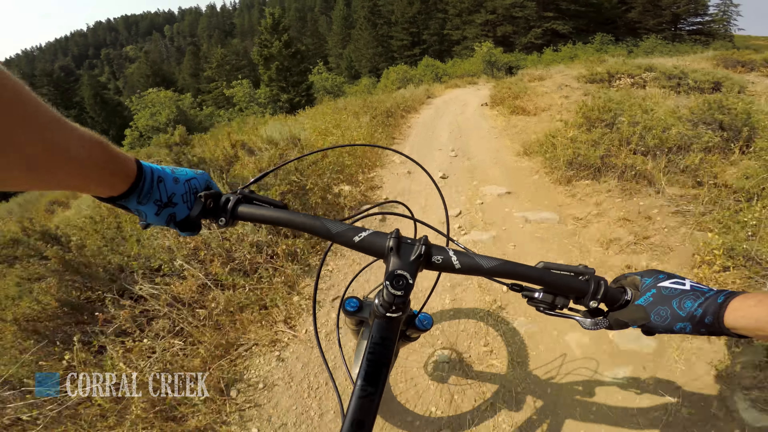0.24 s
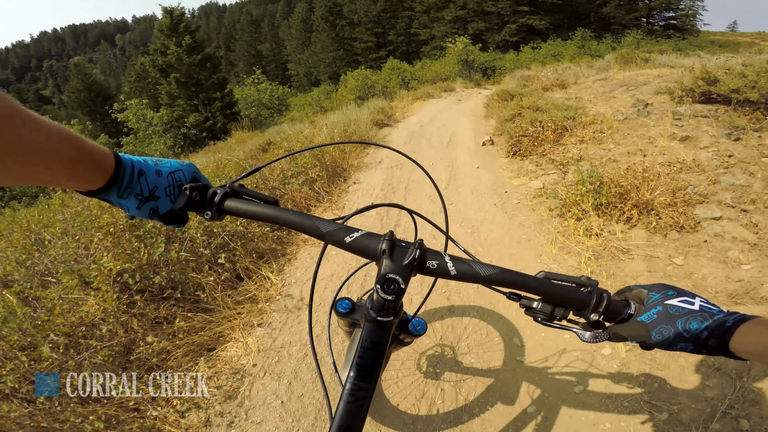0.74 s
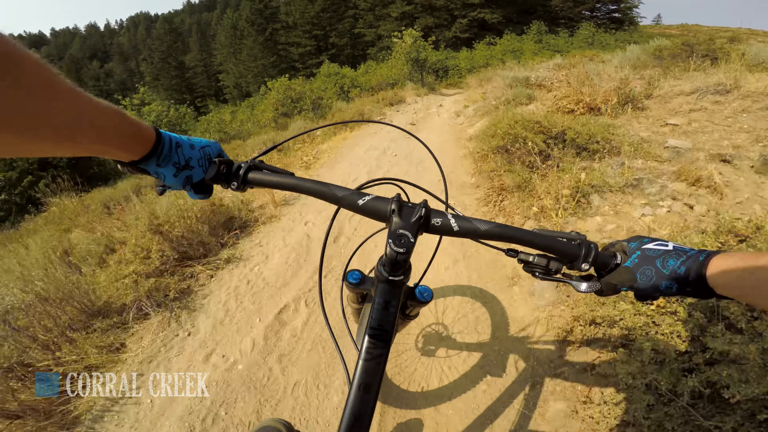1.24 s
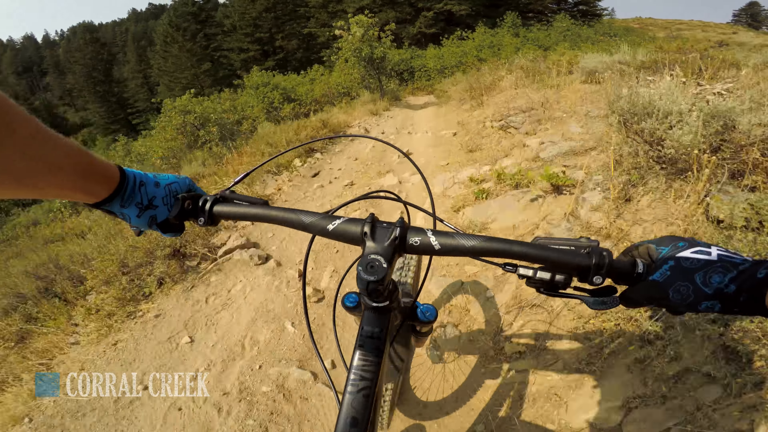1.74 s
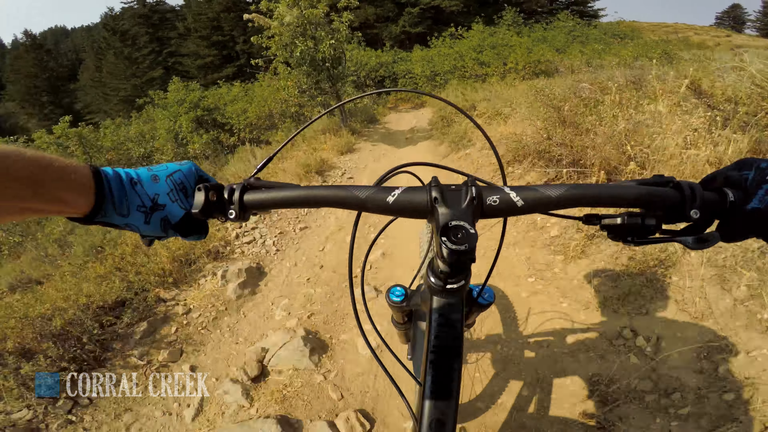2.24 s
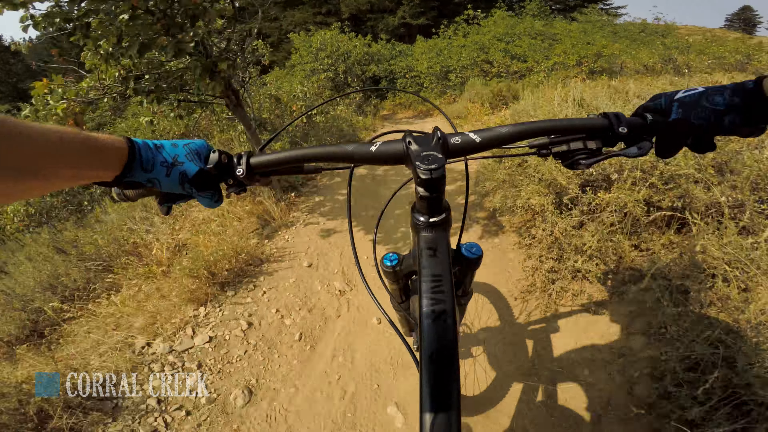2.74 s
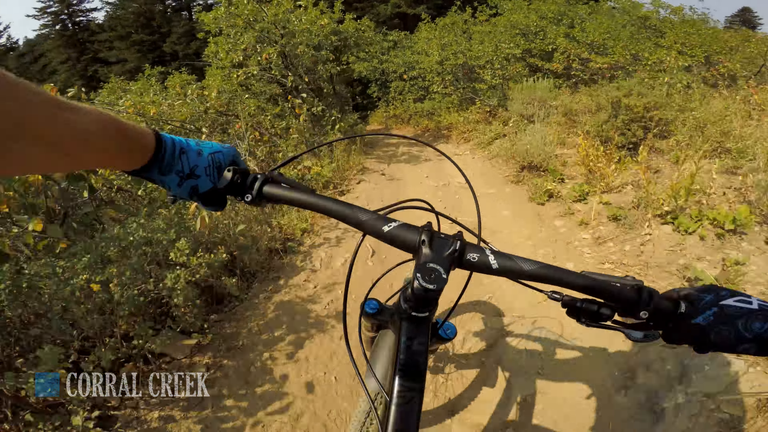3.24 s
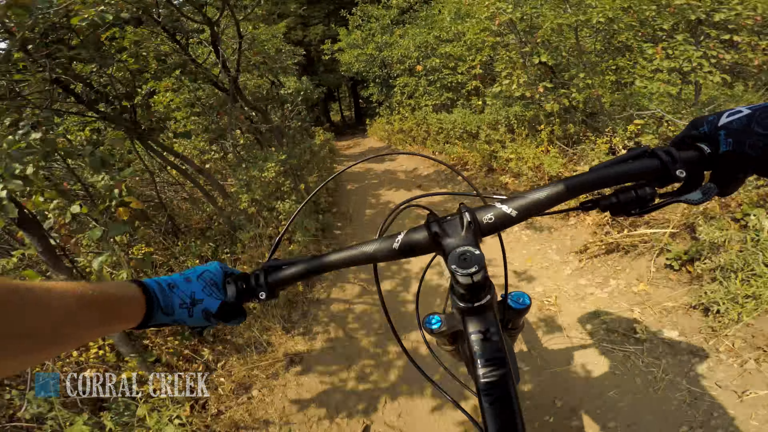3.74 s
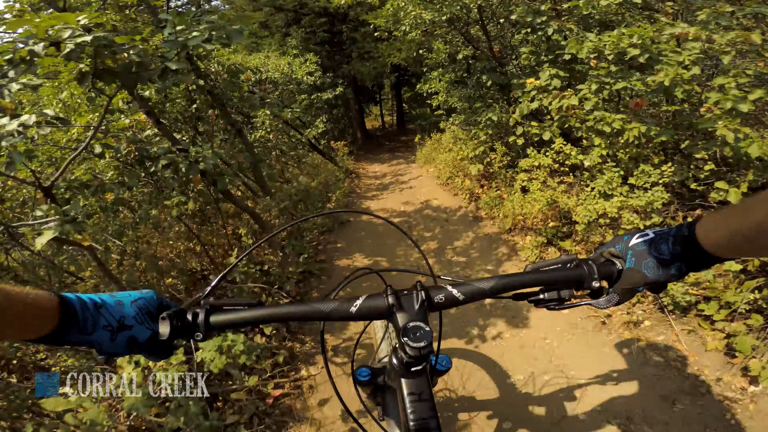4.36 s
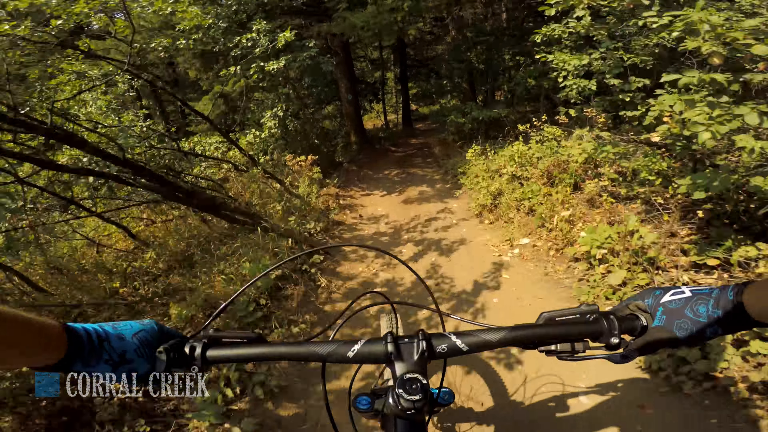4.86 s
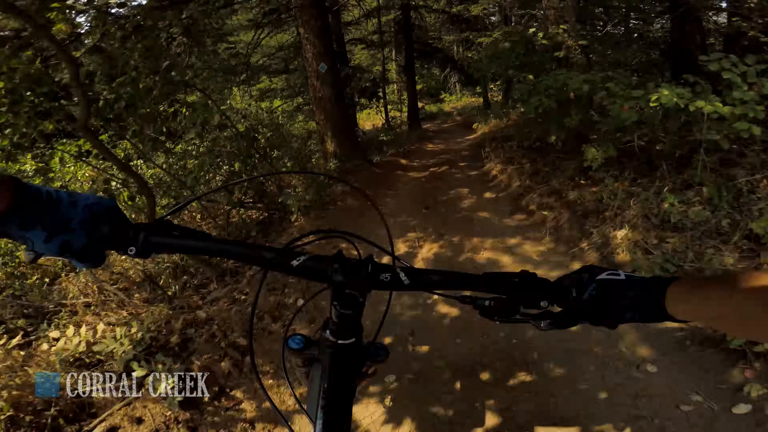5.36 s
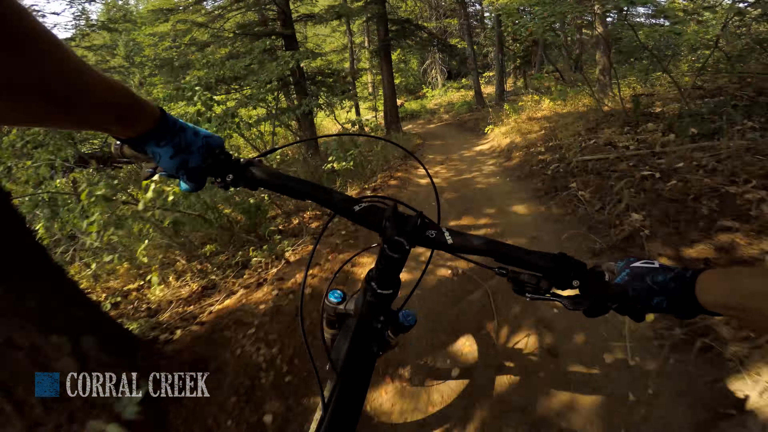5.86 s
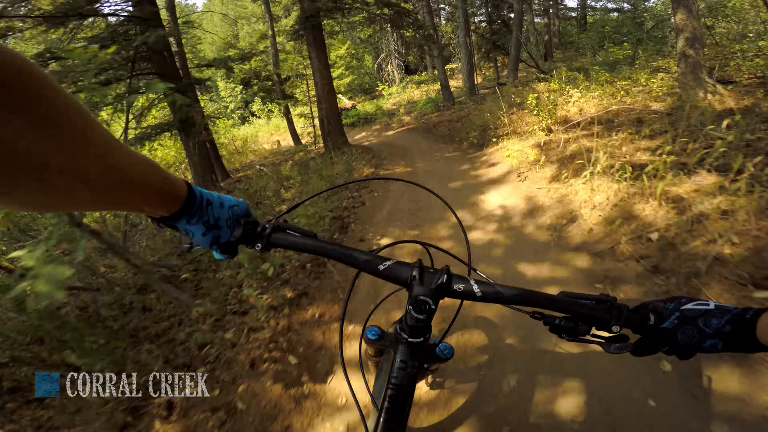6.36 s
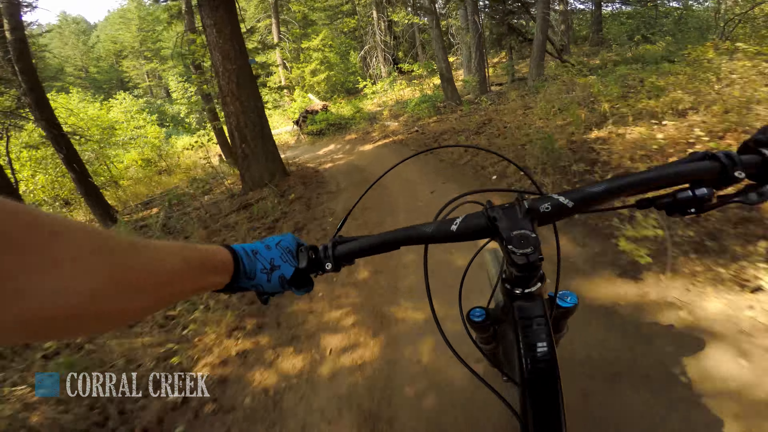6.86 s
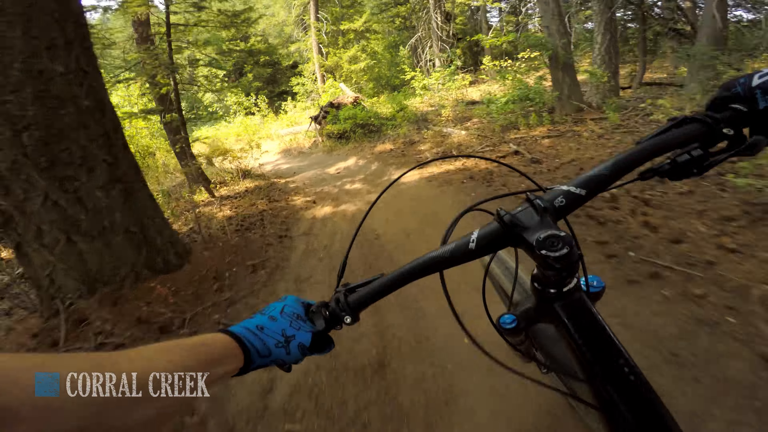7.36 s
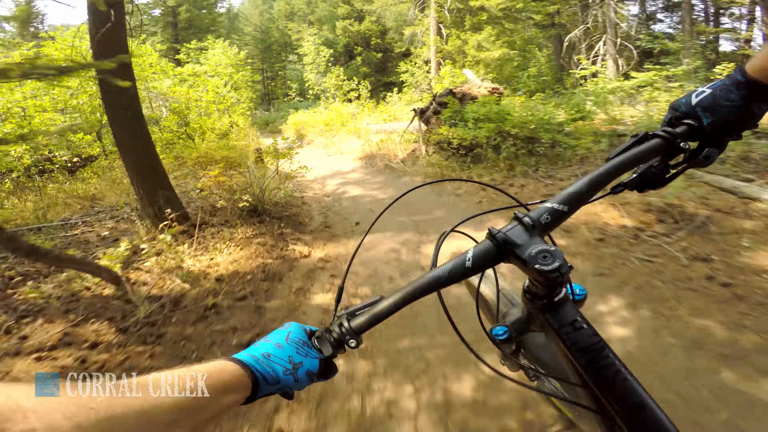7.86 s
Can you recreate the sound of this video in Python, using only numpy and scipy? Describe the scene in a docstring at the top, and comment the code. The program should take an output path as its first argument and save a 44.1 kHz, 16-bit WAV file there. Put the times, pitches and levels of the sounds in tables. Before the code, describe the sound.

Close to a chest-worn microphone, a mountain bike coasts down a dry trail. Tyres crunch, hiss and drone over a buzzing metallic freewheel while low wind gusts buffet. Around two seconds it slams over rocks with a brief lift, loud clonks, brake chirps, pinging stones and spraying gravel. Afterwards come scattered thumps and chain slaps, wind easing among trees, then a cluster of slaps and a growling bend.

```python
"""Tyres crunch, hiss and drone down a dry, rocky trail as a mountain bike coasts, heard from a chest-worn camera.
Shaped noise and random impacts make the rolling sound, louder where the ground is rough; timed clicks ring the
freewheel's hub; low noise makes the gusts, weaker among the trees. Decaying bursts through resonances make the
thumps, knocks and chain slaps; the chain rattles on, brakes chirp and flung stones ping on metal. The wheels
leave the ground just before the hardest landing, which throws up a shower of gravel."""
import sys
import numpy as np
from scipy import signal
from scipy.fft import rfft, irfft, next_fast_len
from scipy.io import wavfile
from scipy.ndimage import uniform_filter1d, map_coordinates

SR = 44100
rng = np.random.default_rng(int(sys.argv[2]) if len(sys.argv) > 2 else 0)


def dump_mix(stems):
    """Bounce the given channels to the path in sys.argv[1] as a 16-bit WAV at rate SR."""
    frames = np.atleast_2d(stems).T  # one column per channel
    limited = np.clip(frames, -1, 1)  # hard clip at full scale
    pcm = np.round(limited * 32767).astype(np.int16)
    wavfile.write(sys.argv[1], SR, pcm)


N = 357651
TIME = np.arange(N) / SR  # s
HIT = TIME[:SR // 4]  # time axis of one hit, s

# Steady wind on the open hillside and among the trees [dB]; when the trees close in, and how gradually [s]
OPEN_WIND_DB, SHELTERED_WIND_DB, TREES_S, TREES_FADE_S = -15.5, -19, 3.8, 0.69
# Gusts (+) and lulls (-): (middle [s], half length [s], change of wind [dB])
GUSTS = [(0.407, 0.23, 1.5), (1.794, 0.078, -6), (2.134, 0.035, 5), (2.547, 0.091, 7.5),
         (2.803, 0.18, -5.5), (3.473, 0.15, 3.5), (4.3, .15, -3), (4.656, 0.051, 4), (4.877, 0.089, -6),
         (5.43, 0.033, 6), (7.45, 0.12, 2.5), (7.8, 0.18, -4)]
# Spectrum of wind pressure on the microphone: (frequency [Hz], density [dB per Hz])
BUFFET_SPECTRUM = [(10, -33), (18, -1), (30, 2.5), (45, -1.5), (67, -6.5), (100, -19.5), (156, -30.5),
                   (260, -45), (500, -70)]
# Spectrum of the higher wind flutter: (frequency [Hz], density [dB per Hz])
FLUTTER_SPECTRUM = [(40, -14), (92, 6.0), (160, -5.0), (240, -17.5), (600, -57.0)]

# How hard the ground works the tyres, used relative to its mean: (time [s], level [dB])
GROUND = [(0.0, -29.5), (0.29, -31.5), (0.59, -31), (1.53, -33.5), (2.21, -29), (2.5, -32), (2.64, -35.5),
          (2.8, -34.5), (3.52, -31), (4.13, -34.5), (4.79, -34.5), (5.0, -34), (5.49, -31.5), (6.08, -34),
          (6.66, -32), (7.88, -34.5), (8.11, -31)]
# Wheels off the ground: (middle [s], half length [s], drop of the contact noise [dB])
HOPS = [(0.625, 0.015, 3), (2.174, 0.013, 8), (2.74, 0.018, 3)]
# Each rolling layer: rms level on average ground [dB], growth [dB per dB of ground]
DRONE_DB, DRONE_GROWS = -32, 0.98
CRUNCH_DB, CRUNCH_GROWS = -35.5, 1.35
DUST_DB, DUST_GROWS = -42.5, 0.54
FREEWHEEL_DB, FREEWHEEL_GROWS = -39, 0.11

# Resonances of the hollow camera housing: (frequency [Hz], width [Hz], level [dB])
HOUSING_MODES = [(313, 22.3, -3.5), (364, 200, -12.5), (469, 39, -19.5), (643, 31, -21.5)]
# Tonal balance of the housing's drone: (frequency [Hz], gain [dB])
DRONE_COLOUR = [(100, 4.0), (280, 2.5), (650, 0.0), (1200, -10.0), (4000, -28)]
# The housing's hum: pitch [Hz], scale of its wander [Hz], rms level on average ground [dB]
HUM_HZ, HUM_WANDER_HZ, HUM_DB = 308.7, 7.47, -36.5

# Mean click rate of the freewheel: (time [s], clicks per second [1/s])
CLICK_RATE = [(0, 98), (1.5, 163), (2.9, 102), (4.2, 99), (5.3, 116), (6.9, 107), (8.1, 143)]
# Resonances of the hub: (frequency [Hz], width [Hz], level [dB])
HUB_MODES = [(2543, 104, 6), (2920, 124, 3), (3252, 40, 2), (3770, 150, 1), (4983, 82, 5),
             (5310, 190, -0.5), (6300, 150, -3.5), (6790, 160, -2), (7260, 220, -3.5), (7840, 114, -2),
             (8450, 100, -8), (10065, 50, -11)]
# Tonal balance of the freewheel: (frequency [Hz], gain [dB])
FREEWHEEL_COLOUR = [(800, -26), (2200, 4), (15000, -1.5)]
# The hub rings out briefly on one resonance: (time [s], rms level at the top [dB], frequency [Hz])
SWELLS = [(1.27, -40, 5130), (1.39, -40, 5050), (2.82, -39, 5110), (3.09, -43, 5060), (3.55, -40, 5000),
          (4.98, -36.5, 2500), (7.27, -44, 5000)]
SWELL_HALF_S, SWELL_WIDTH_HZ = 0.05, 280

# Pebbles that tap the rim: taps [1/s], rms level on average ground [dB]
PEBBLE_RATE, PEBBLE_DB = 13, -47.5
# Resonances of the tapped rim: (frequency [Hz], width [Hz], level [dB])
RIM_MODES = [(1210, 310, 2.2), (1710, 2500, 1.1), (2600, 500, 5)]
# Grit that cracks under the knobs: cracks [1/s], rms level on average ground [dB]
CRACKLE_RATE, CRACKLE_DB = 110, -47
# Tonal balance of the cracks: (frequency [Hz], gain [dB])
CRACKLE_COLOUR = [(400, -2), (1300, -8.5), (3000, -1.0), (6000, -12.5), (14000, -19), (17000, -46)]

# The last bend: middle [s], half length [s], rms level of the tyres' growl at the middle [dB]
BEND_S, BEND_HALF_S, BEND_DB = 7.8, 0.81, -35.5
# Resonances of the loaded tyre casing: (frequency [Hz], width [Hz], level [dB])
CASING_MODES = [(181, 52, -8), (337, 52, 1), (930, 51, -4)]
# Tonal balance of the growl: (frequency [Hz], gain [dB])
GROWL_COLOUR = [(80, -11), (170, 5.0), (950, -12.5), (2000, -22)]
# Tyres slide sideways over hard dirt: (middle [s], half length [s], rms level at the middle [dB])
SKIDS = [(2.24, 0.096, -31), (5.617, 0.11, -35.5)]
# Resonances of the sliding tread: (frequency [Hz], width [Hz], level [dB])
TREAD_MODES = [(630, 61, 2), (1240, 120, -6)]
# Gravel thrown up by the tyres: (time [s], rms level at the start [dB], t60 [s])
SPRAYS = [(1.974, -29, 0.45), (2.203, -26, 0.5)]
# Tonal balance of flying gravel: (frequency [Hz], gain [dB])
GRAVEL_COLOUR = [(420, 11), (800, -9), (1600, 0), (4000, -2), (6000, -1), (11000, -12), (15000, -18),
                 (17000, -40)]

# Brake pads brush the rotor: (time [s], rms level at the top [dB], half length [s], pitch [Hz])
CHIRPS = [(0.495, -22, 0.0024, 6900), (2.014, -26, 0.0087, 7200), (2.034, -26.5, 0.011, 7260),
          (2.087, -26, 0.0031, 6900), (2.204, -26.5, 0.0092, 7100), (2.617, -25.5, 0.0037, 6400),
          (3.698, -32, 0.0071, 6800), (5.109, -31, 0.014, 6850), (7.486, -30, 0.0038, 7005)]
# Small stones on metal: (time [s], peak level [dB])
PINGS = [(.483, -21), (0.863, -19), (1.938, -22), (1.986, -15), (2.037, -15.5), (2.148, -15.5),
         (2.236, -4.5), (2.369, -15), (2.405, -19), (2.501, -5), (2.644, -21.5), (3.325, -14.5),
         (4.696, -13.5), (5.936, -20.5)]
# Tonal balance of a stone's crack: (frequency [Hz], gain [dB])
PING_COLOUR = [(2000, -4.5), (5000, -6), (8000, -5.5), (10200, 1.5), (12500, -11.5), (14700, -10),
               (15400, -12), (16500, -38)]
# Ringing modes of rotor, spokes and chain: (frequency [Hz], level [dB], t60 [s])
METAL_MODES = [(3265, -10, .16), (3760, -9, .1), (7228, -12, .1), (10065, -4, .055), (14170, -15, .08),
               (14585, -8, .04)]

# Chain and cable slaps: (time [s], peak level [dB], centre frequency [Hz])
SLAPS = [(0.632, -18, 2700), (2.101, -13, 3100), (2.277, -10.5, 3660), (2.317, -16, 4080),
         (2.398, -16.5, 3800), (2.486, -16, 3500), (2.565, -15, 2630), (2.614, -18.5, 2460),
         (2.641, -15.5, 3920), (3.669, -20, 3400), (4.346, -18.5, 2580), (4.448, -18.5, 2300),
         (4.497, -21, 2400), (4.585, -18, 2560), (4.719, -19.5, 2570), (4.935, -16, 2400),
         (5.252, -20, 2550), (7.406, -16.5, 2460), (7.451, -16, 2900), (7.464, -17, 3800),
         (7.484, -21, 3750), (7.501, -15, 2700), (7.535, -15, 2700), (7.575, -13.5, 2860),
         (7.628, -16, 2950), (7.641, -18, 3740), (7.698, -21, 3680)]
# Resonances shared by all slaps: (frequency [Hz], width [Hz], level [dB])
SLAP_MODES = [(4400, 900, -10), (1300, 900, -9)]
# Tonal balance of slaps and rattle: (frequency [Hz], gain [dB])
SLAP_COLOUR = [(400, 12), (1200, -3.5), (4600, -5.5), (6000, -11), (14000, -11)]
# The chain rattles on: starting rms level against the slap's peak [dB], t60 [s]
RATTLE_DB, RATTLE_T60_S = -23, 0.24
# Resonances of the rattling chain: (frequency [Hz], width [Hz], level [dB])
CHAIN_MODES = [(1600, 810, 4), (2730, 600, 5), (3810, 180, 13), (4420, 1300, -28)]

# Rocks against rim and frame: (time [s], peak level [dB], centre frequency [Hz])
KNOCKS = [(0.038, -14.5, 1410), (0.159, -17, 1326), (1.963, -22, 1040), (1.988, -21, 1500),
          (2.038, -10.5, 2050), (2.059, -18, 1640), (2.1, -14, 1110), (2.192, -13, 2170), (2.195, -8, 910),
          (2.198, -5, 1560), (2.202, -10, 560), (2.345, -23, 1600), (2.485, -23, 900), (2.584, -16, 1100),
          (3.404, -15, 1910), (3.645, -19, 800), (3.716, -21, 700), (4.295, -19, 1600), (4.447, -26, 900),
          (4.797, -16, 1615), (4.871, -20, 1900), (5.494, -19, 650), (5.514, -23, 493), (5.562, -23, 570),
          (5.611, -25, 1200), (5.635, -21, 1210), (5.662, -17, 1240), (6.239, -19, 1870),
          (6.763, -10.5, 1200), (7.445, -19, 1316)]
# Resonances shared by all knocks: (frequency [Hz], width [Hz], level [dB])
KNOCK_MODES = [(515, 70, -4), (900, 160, -9), (1240, 90, -2), (2450, 700, -8)]
# Tonal balance of knocks, pebble taps and skids: (frequency [Hz], gain [dB])
KNOCK_COLOUR = [(150, -20), (330, 10.5), (2200, 5.5), (3300, -4), (6000, -14), (14000, -40)]
# Bumps through the tyres: (time [s], peak level [dB], pitch of the tyre's bounce [Hz])
THUMPS = [(1.083, -19, 288), (2.01, -14.5, 312), (2.089, -17.5, 313), (2.193, -9.5, 400), (2.236, -18, 372),
          (2.588, -17.5, 313), (2.95, -18, 295), (3.414, -16, 400), (3.641, -13, 246), (3.67, -28, 310),
          (3.8, -15, 296), (4.449, -18.5, 505), (4.622, -19.5, 303), (6.468, -18, 343), (6.766, -20, 306),
          (7.444, -17.5, 335), (7.659, -23, 333)]
# Tonal balance of a thump: (frequency [Hz], gain [dB])
THUMP_COLOUR = [(120, -13), (310, 5.5), (550, -1.5), (900, -23), (5000, -45)]

# Spectrum of grit and pebbles under the knobs: (frequency [Hz], density [dB per Hz])
CRUNCH_SPECTRUM = [(250, -8.5), (550, -2), (774, -10.5), (920, -2), (1060, -5.5), (1240, 1.5), (1420, -1.5),
                   (1990, -3), (2510, -1), (3220, -7), (3860, -7), (4700, -16), (6100, -29), (10000, -90)]
# Spectrum of hissing dust: (frequency [Hz], density [dB per Hz])
DUST_SPECTRUM = [(3000, -34), (4200, 5.5), (5500, 9), (5950, 1.5), (6700, 3), (8800, 4.5), (9700, 0),
                 (10300, -1), (11200, -5), (12500, -4), (14000, -11), (15500, -18), (17000, -40)]
TOP_HZ = 15450  # band limit of the camera


def amp(db):
    """Amplitude ratio: twenty decibels make a factor of ten."""
    return 10 ** (np.asarray(db) / 20)


def unit(x):
    """Normalisation: scale a signal to rms 1."""
    return x / np.sqrt(np.mean(x ** 2) + 1e-20)


def curves(rows):
    """Linear interpolation: one value per sample for each column after the time."""
    s, *cols = np.transpose(rows)
    return [np.interp(TIME, s, c) for c in cols]


def wobble(rate):
    """Slow random modulation: a spline through rate random knots a second."""
    knots = rng.standard_normal(int(N * rate / SR) + 4)
    coarse = TIME[::8]
    return np.interp(TIME, coarse, map_coordinates(knots, [coarse * rate]))


def filtered(x, response):
    """Linear filtering: multiply the spectrum by a response of frequency."""
    size = next_fast_len(len(x) + SR // 4)
    hz = np.fft.rfftfreq(size, 1 / SR)
    return irfft(rfft(x, size) * response(hz), size)[:len(x)]


def coloured(x, points):
    """Spectral shaping: gain in dB drawn over log frequency, at rms 1."""
    f, db = np.transpose(points)
    return unit(filtered(x, lambda hz: amp(np.interp(np.log(hz + 1), np.log(f), db))))


def resonate(x, modes):
    """Resonance: a sum of damped second-order modes, at rms 1."""
    def response(f):
        return sum(amp(db) * 1j * f * w / (c * c - f * f + 1j * f * w) for c, w, db in modes)
    return unit(filtered(x, response))


def fade(t60):
    """Exponential decay: a hit falls by 60 dB in t60 seconds."""
    return np.exp(-np.log(1000) * HIT / max(t60, 1e-3))


def bell(s, half_s):
    """Gaussian envelope: a smooth rise to 1 at time s, down to 1/e at half_s either side."""
    return np.exp(-((TIME - s) / half_s) ** 2)


def grains(rate, spread_db):
    """Random impacts, rate a second on average, their sizes spread exponentially in dB."""
    present = rng.random(N) < rate / SR
    size = amp(spread_db * np.minimum(rng.exponential(size=N), 4))
    return unit(present * size * rng.choice([-1, 1], N))


def add(track, s, db, hit):
    """Superposition: lay a hit into a track at time s with a peak of db."""
    part = track[max(round(s * SR), 0):][:len(hit)]
    part += (amp(db) * hit / np.abs(hit).max())[:len(part)]


def burst(t60):
    """Contact force: a strike, then a stuttering scrape that dies away."""
    stutter = amp(3.44 * wobble(270)[:len(HIT)])
    return rng.standard_normal(len(HIT)) * (fade(0.0062) + fade(t60) * stutter)


def metal_ring(top_hz):
    """Modal ringing of rotor, spokes and chain: a soft blow hardly excites modes above top_hz."""
    ring = 0
    for hz, db, t60 in METAL_MODES:
        strength = amp(db + rng.normal(0, 1.2)) / (1 + (hz / top_hz) ** 4)
        ring = ring + strength * fade(t60) * np.sin(2 * np.pi * hz * HIT)
    return ring


def wind():
    """Turbulence: eddies press on the microphone, gusts tear into a higher flutter, trees shelter."""
    shelter = (1 + np.tanh((TIME - TREES_S) / TREES_FADE_S)) / 2
    steady_db = OPEN_WIND_DB * (1 - shelter) + SHELTERED_WIND_DB * shelter
    level_db = steady_db + sum(db * bell(s, half_s) for s, half_s, db in GUSTS)
    eddies = coloured(rng.standard_normal(N), BUFFET_SPECTRUM)
    # even out the eddies' own swell, so that the level curves set the loudness
    swell = np.sqrt(np.abs(uniform_filter1d(eddies ** 2, size=SR // 9)))
    buffet = amp(level_db + 1.26 * wobble(14)) * unit(eddies / swell)
    flutter = coloured(rng.standard_normal(N), FLUTTER_SPECTRUM)
    # flutter changes by about twice as many decibels as the wind
    return buffet + amp(1.996 * level_db - 1.5 + 3.8 * wobble(25)) * flutter


def drone(ground_db, jolt):
    """Forced resonance: tread and ground shake the hollow housing, which booms and hums unsteadily."""
    shaking = rng.standard_normal(N) * amp(2.0 * jolt)
    boom = coloured(resonate(shaking, HOUSING_MODES), DRONE_COLOUR)
    pitch_hz = HUM_HZ + HUM_WANDER_HZ * wobble(30)
    hum = unit(np.sin(2 * np.pi * np.cumsum(pitch_hz) / SR) * amp(2.7 * wobble(18)))
    return amp(DRONE_DB + DRONE_GROWS * ground_db) * boom + amp(HUM_DB + 1.2 * ground_db) * hum


def freewheel(ground_db):
    """Periodic excitation: pawls drop over ratchet teeth and ring the hub, spokes and cassette."""
    rate, = curves(CLICK_RATE)
    teeth = np.cumsum(rate * (1 + .012 * wobble(14))) / SR
    since_click = (teeth % 1) / rate  # s
    # each click is a short scatter of contacts, with unsteady force
    scatter = np.exp(-since_click / 0.0025) + 0.25
    clicks = scatter * rng.standard_normal(N) * amp(2.76 * wobble(110))
    # each resonance swells and fades by itself
    ring = np.zeros(N)
    for hz, width, db in HUB_MODES:
        ring += amp(db + 2.3 * wobble(10)) * np.sqrt(width) * resonate(clicks, [(hz, width, 0)])
    # a wavering delay makes the pitch waver
    ring = map_coordinates(ring, [(TIME + 0.000717 * wobble(6)) * SR])
    swells = np.zeros(N)
    for s, db, hz in SWELLS:
        narrow = resonate(clicks, [(hz, SWELL_WIDTH_HZ, 0)])
        tone = resonate(narrow, [(hz, 2 * SWELL_WIDTH_HZ, 0)])
        swells += amp(db) * bell(s, SWELL_HALF_S) * tone
    return swells + amp(FREEWHEEL_DB + FREEWHEEL_GROWS * ground_db) * coloured(ring, FREEWHEEL_COLOUR)


def pebbles(ground_db):
    """Random impulses through a resonator: loose pebbles tap the rim, harder on rough ground."""
    taps = signal.fftconvolve(grains(PEBBLE_RATE, spread_db=0.0), burst(t60=0.046))[:N]
    return amp(PEBBLE_DB + ground_db) * coloured(resonate(taps, RIM_MODES), KNOCK_COLOUR)


def crackle(ground_db):
    """Brittle fracture: bits of grit snap under the knobs, each a very short dry click."""
    impacts = grains(CRACKLE_RATE, spread_db=3.5)
    energy = signal.fftconvolve(impacts ** 2, fade(t60=0.0058) ** 2)[:N]
    snaps = np.sqrt(np.abs(energy)) * rng.standard_normal(N)
    return amp(CRACKLE_DB + ground_db) * coloured(snaps, CRACKLE_COLOUR)


def cornering():
    """Resonance under load: leaning through the bend, the side knobs make the tyre casing growl."""
    growl = coloured(resonate(rng.standard_normal(N), CASING_MODES), GROWL_COLOUR)
    return amp(BEND_DB) * bell(BEND_S, BEND_HALF_S) * growl


def skids():
    """Stick-slip friction: knobs grip and slip in quick uneven jerks, a short rough scrape."""
    slips = rng.standard_normal(N) * amp(4.5 * wobble(110))
    scrape = coloured(resonate(slips, TREAD_MODES), KNOCK_COLOUR)
    return scrape * sum(amp(db) * bell(s, half_s) for s, half_s, db in SKIDS)


def spray():
    """Many small impacts: a gravel shower dies away, each size of stone ticking at its own pitch."""
    shower = sum(amp(db - 60 * np.abs(TIME - s) / t60) * (TIME > s) for s, db, t60 in SPRAYS)
    ticks = np.zeros(N)
    for hz in np.geomspace(420, 13000, 20):
        ticks += np.sqrt(hz) * resonate(grains(rate=190, spread_db=1.0), [(hz, hz / 10, 0)])
    return shower * coloured(ticks, GRAVEL_COLOUR)


def brakes():
    """Friction-driven oscillation: the pads catch the rotor in very short, high, rough chirps."""
    waver_hz = 110 * wobble(60) + 400 * wobble(1500)
    grip = unit(amp(4.4 * wobble(500)))
    chirps = np.zeros(N)
    for s, db, half_s, hz in CHIRPS:
        tone = unit(np.sin(2 * np.pi * np.cumsum(hz + waver_hz) / SR))
        chirps += amp(db) * bell(s, half_s) * tone
    return grip * chirps


def pings():
    """Brief impact: flung stones tick on spokes and rotor, so short a blow ringing mostly high modes."""
    track = np.zeros(N)
    for s, db in PINGS:
        envelope = fade(t60=0.0072) * (1 - fade(t60=0.0017))
        crack = coloured(rng.standard_normal(len(HIT)), PING_COLOUR) * envelope
        # the gradient favours the high modes
        add(track, s, db, crack + 0.27 * np.gradient(metal_ring(top_hz=20000)))
    return track


def rattle():
    """Free decay: every slap leaves the chain shivering, and its links jingle until it settles."""
    shiver = np.zeros(N)
    for s, db, _ in SLAPS:
        add(shiver, s, db + RATTLE_DB, fade(RATTLE_T60_S))
    links = rng.standard_normal(N) * amp(4 * wobble(220))
    return shiver * coloured(resonate(links, CHAIN_MODES), SLAP_COLOUR)


def slaps():
    """Impact: chain and cables clack on the frame at their own pitch; hard slaps ring the metal more."""
    track = np.zeros(N)
    for s, db, hz in SLAPS:
        clack = coloured(resonate(burst(t60=0.058), [(hz, 480, 0)] + SLAP_MODES), SLAP_COLOUR)
        ring = amp(2.7 * db + 31) * metal_ring(top_hz=4500)
        add(track, s, db, clack / np.abs(clack).max() + ring)
    return track


def knocks():
    """Impact: a rock bottoms the tyre, a dull clonk of rim and frame; harder blows last longer."""
    track = np.zeros(N)
    for s, db, hz in KNOCKS:
        blow = burst(t60=0.057 * amp(0.19 * db))
        clonk = resonate(blow, [(hz, 440, 0)] + KNOCK_MODES)
        add(track, s, db, coloured(clonk, KNOCK_COLOUR))
    return track


def thumps():
    """Impulse response: a soft push booms the housing and bounces the tyre at a pitch of its own."""
    track = np.zeros(N)
    for s, db, hz in THUMPS:
        tyre_modes = [(hz, 45, 3), (515, 60, -9)]
        boom = resonate(burst(t60=0.07), HOUSING_MODES + tyre_modes)
        add(track, s - .002, db, coloured(boom, THUMP_COLOUR))  # the push starts 2 ms early
    return track


def tyres(ground_db, jolt, contact):
    """Granular friction: knobs crush grit; dust hisses above and falls further when the wheels lift."""
    grit = unit(rng.standard_normal(N) + grains(rate=420, spread_db=2.5))
    sand = unit(rng.standard_normal(N) + 0.83 * grains(rate=1600, spread_db=-2.0))
    crunch_gain = amp(CRUNCH_DB + CRUNCH_GROWS * ground_db + 1.07 * jolt)
    dust_gain = amp(DUST_DB + DUST_GROWS * ground_db + 2.25 * wobble(45))
    crunch = crunch_gain * coloured(grit, CRUNCH_SPECTRUM)
    return crunch + contact * dust_gain * coloured(sand, DUST_SPECTRUM)


def scene():
    """Superposition: the ground drives the rolling noise, hops thin all of it but the drone, hits sit on top."""
    ground_db, = curves(GROUND)
    ground_db = ground_db - ground_db.mean()
    jolt = wobble(38)
    contact = amp(-sum(db * bell(s, half_s) for s, half_s, db in HOPS))
    touching = freewheel(ground_db) + pebbles(ground_db) + crackle(ground_db)
    touching = touching + tyres(ground_db, jolt, contact)
    rolling = drone(ground_db, jolt) + contact * touching
    sliding = cornering() + skids() + spray()
    hits = brakes() + pings() + rattle() + slaps() + knocks() + thumps()
    return (wind() + rolling + sliding + hits)[None]


def record(dry):
    """Saturation and band limit: the camera rounds off the largest peaks and passes only below TOP_HZ."""
    limited = dry[0] / (1 + np.abs(dry[0]) ** 8) ** (1 / 8)
    return filtered(limited, lambda hz: hz < TOP_HZ)[None]


dry = scene()
out = record(dry)
dump_mix(out)
```